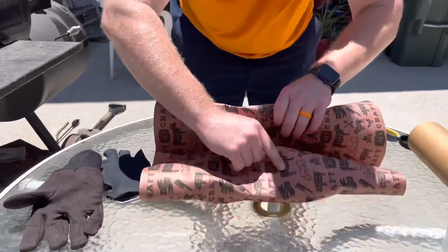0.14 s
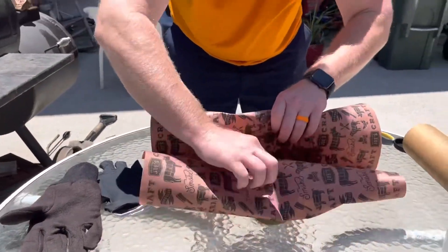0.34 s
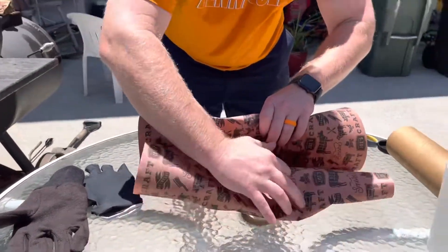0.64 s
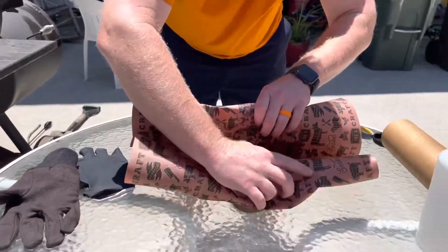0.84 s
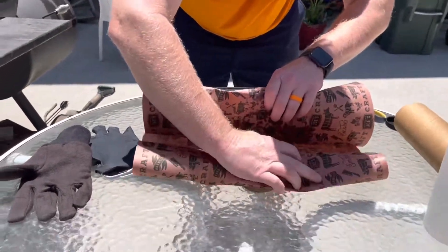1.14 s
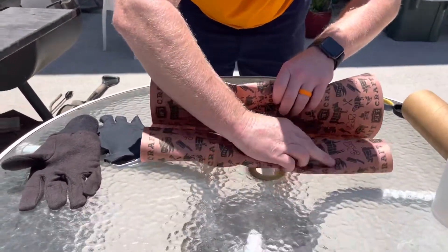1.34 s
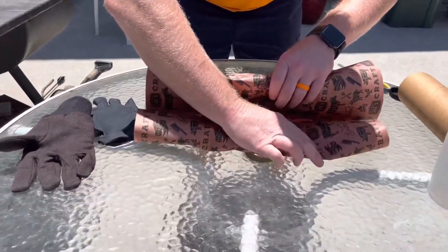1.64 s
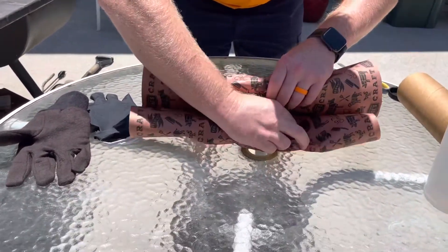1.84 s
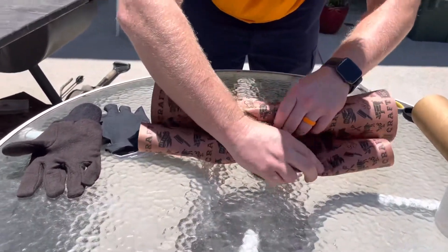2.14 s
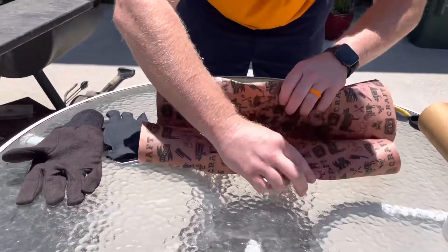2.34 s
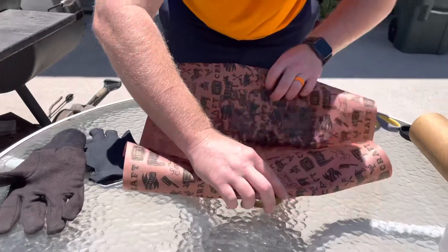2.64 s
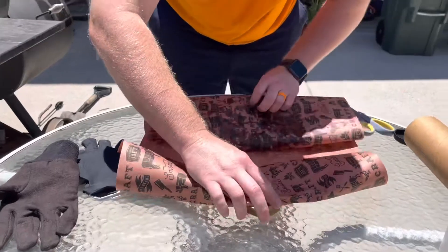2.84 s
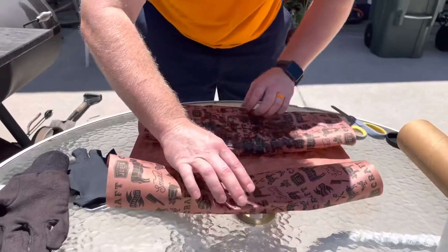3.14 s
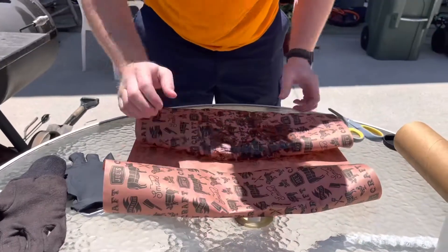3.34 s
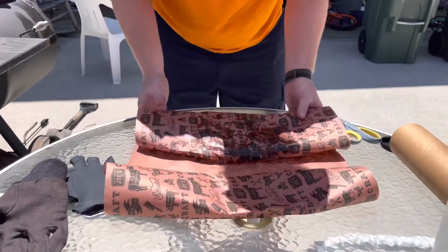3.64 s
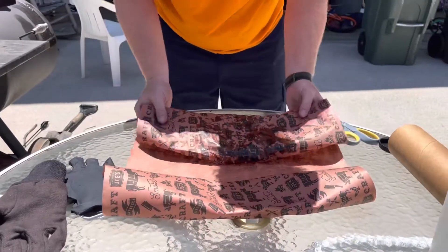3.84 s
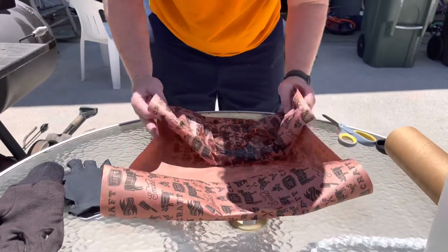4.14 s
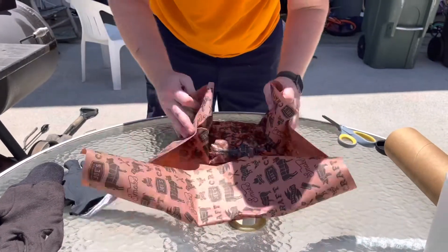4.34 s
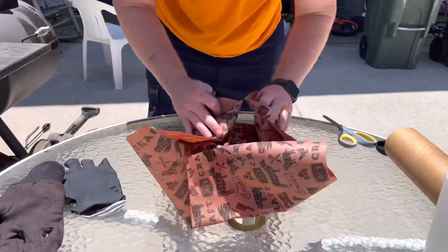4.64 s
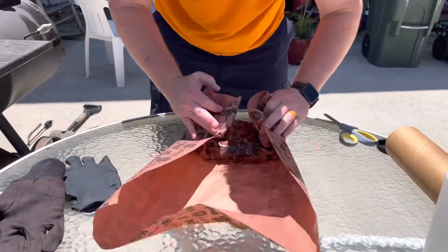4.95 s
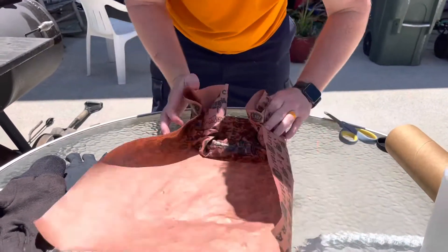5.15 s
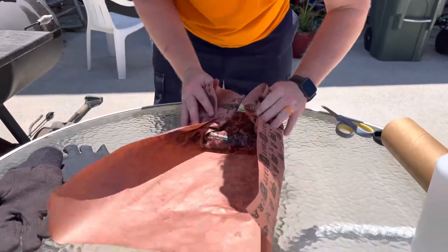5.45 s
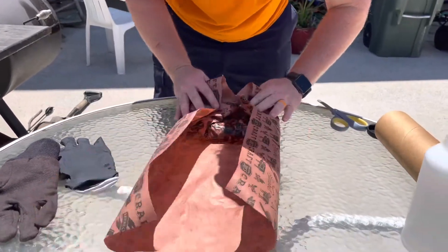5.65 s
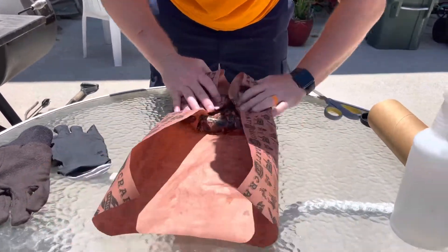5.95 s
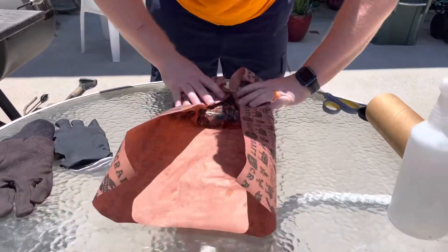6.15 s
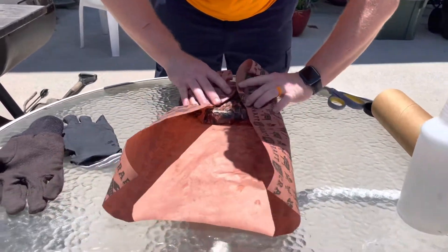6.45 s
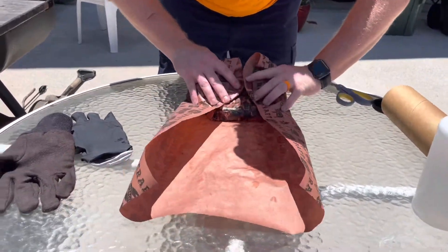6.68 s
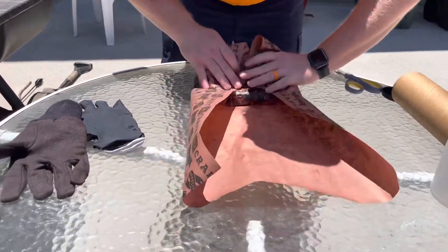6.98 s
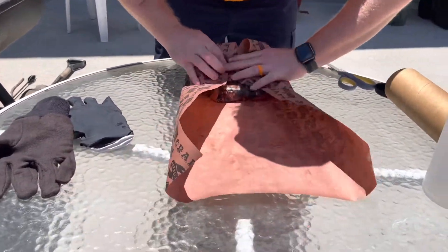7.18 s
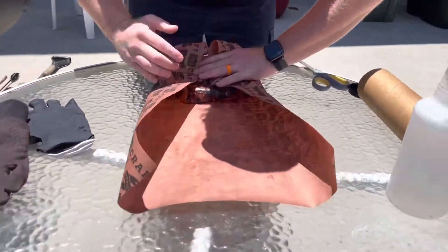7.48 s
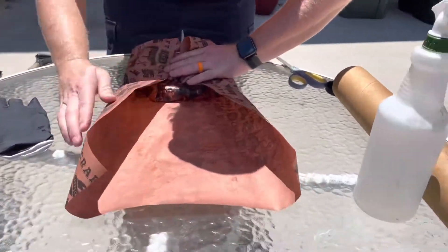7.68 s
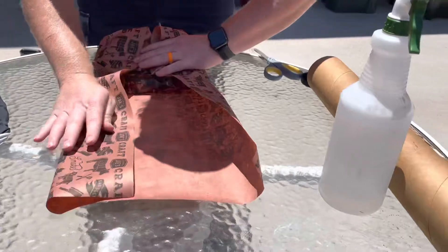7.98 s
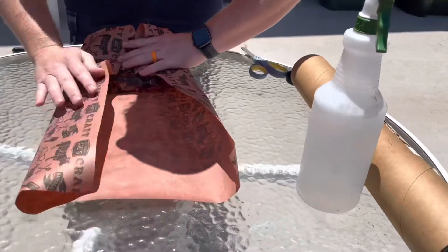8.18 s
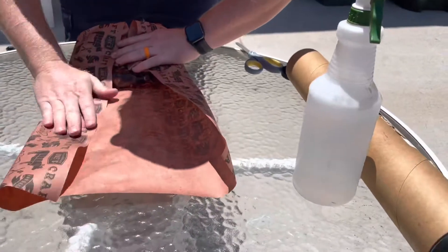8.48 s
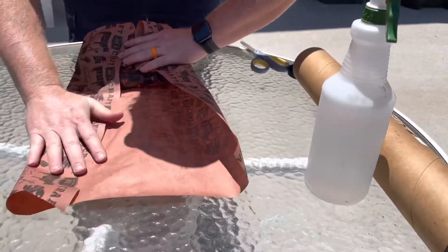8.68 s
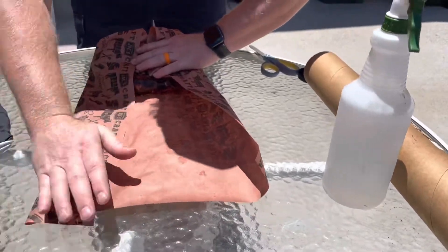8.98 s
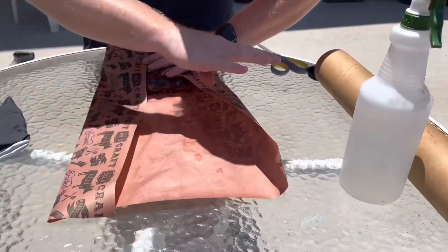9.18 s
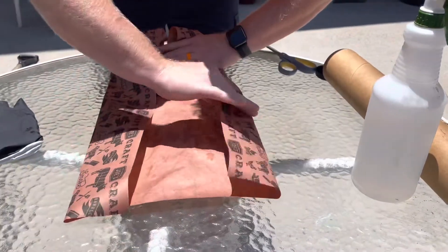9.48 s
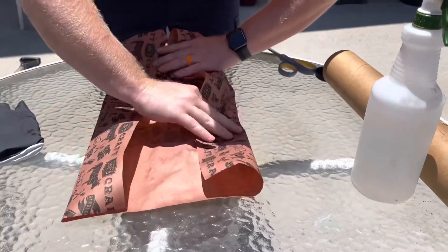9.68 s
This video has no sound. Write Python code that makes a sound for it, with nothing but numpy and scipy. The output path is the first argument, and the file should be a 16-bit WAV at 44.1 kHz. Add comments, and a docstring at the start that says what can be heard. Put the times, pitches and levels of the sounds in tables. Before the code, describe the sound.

Thick paper crinkles, rustles and pops under busy hands on a patio table. Early handling is soft and hollow, dropping almost to nothing after about three seconds. Then it grows crisp and loud, with hard cracks and smooth sliding strokes, a short calm near nine seconds, and a final burst of folding. Dry open-air close stereo pickup with light low wind buffeting.

```python
"""Stiff wrapping paper is folded, creased and smoothed by hand on a garden table, close to a phone.
Creases snap as noise bursts with two panel modes and a brief spit from the edge.
Beneath them the sheet rustles: clumped noise grains, ringing facets, booms and the hiss of sliding palms.
A breeze buffets and flutters at the two microphone ports, as low noise swelling in gusts."""
import sys
import numpy as np
from scipy import signal
from scipy.fft import rfft, irfft, next_fast_len
from scipy.io import wavfile
from scipy.ndimage import uniform_filter1d, map_coordinates

SR = 44100
rng = np.random.default_rng(int(sys.argv[2]) if len(sys.argv) > 2 else 0)


def bounce(signal):
    """Save signal as a 16-bit WAV file at the path given by the first command-line argument."""
    frames = np.transpose(np.atleast_2d(signal))
    limited = np.clip(frames, -1, 1)
    pcm = np.round(limited * 32767).astype(np.int16)
    wavfile.write(sys.argv[1], SR, pcm)


N = 433062  # length [samples]
TOP_HZ = 16900  # band limit


def amp(db):
    """Decibels to gain."""
    return 10 ** (np.asarray(db) / 20)


def unit(x):
    """Scaled to rms 1."""
    return x / np.sqrt(np.mean(x ** 2) + 1e-20)


def along(points, hz):
    """Value at hz of a (frequency, value) curve, read on a log frequency axis."""
    f, v = np.transpose(points)
    return np.interp(np.log(hz + 1), np.log(f + 1), v)


def curves(rows):
    """One value per sample for each column after the time."""
    seconds, *columns = np.transpose(rows)
    return [np.interp(np.arange(N) / SR, seconds, column) for column in columns]


def wobble(rate):
    """A smooth random curve, rate knots a second."""
    knots = rng.standard_normal(int(N * rate / SR) + 4)
    return map_coordinates(knots, [np.arange(N) * rate / SR])


def filtered(x, response):
    """x times a complex response of frequency."""
    m = next_fast_len(N + 8192)
    return irfft(rfft(x, m) * response(np.fft.rfftfreq(m, 1 / SR)), m)[..., :N]


def coloured(x, spectrum):
    """x shaped by a (frequency, gain) spectrum, at rms 1."""
    return unit(filtered(x, lambda hz: amp(along(spectrum, hz))))


def swell(start, length, db, rise_db_per_s, fall_db_per_s):
    """Power of a sound that rises up to its start, holds for its length and dies away."""
    t = np.arange(N) / SR
    drop_db = np.maximum(rise_db_per_s * (start - t), fall_db_per_s * (t - start - length))
    return amp(2 * (db - drop_db.clip(0, 120)))


# Gusts: (full strength from [s], held for [s], buffet before trim [dB], flutter re buffet before trims [dB])
GUSTS = [(0.206, 0.013, -38.5, 0), (0.272, 0.013, -43.5, 6), (0.632, 0.015, -40.5, 6.5),
         (0.781, 0.075, -34, -8.5), (1.202, 0.058, -40, -5), (1.452, 0.05, -33.5, 1.5),
         (1.608, 0.17, -40.5, -1.5), (1.914, 0.14, -41, 3.5), (2.139, 0.014, -29.5, -4),
         (2.519, 0.015, -38, 1), (4.103, 0.0073, -31.5, -3), (5.934, 0.025, -35, -5),
         (6.358, 0.079, -33.5, -10.5), (6.886, 0.01, -33.5, -2), (7.292, 0.014, -34, -4),
         (7.442, 0.061, -39.5, 5), (7.522, 0.073, -31.5, -6.5), (8.427, 0.053, -38.5, -3),
         (9.152, 0.15, -34.5, -3.5), (9.455, 0.026, -34, -4.5)]
GUST_RISE_DB_PER_S, GUST_FALL_DB_PER_S = 495, 217
# Light breeze between gusts: (time [s], buffet before trim [dB])
BREEZE_LEVEL = [(0, -41.5), (1.2, -50), (1.8, -41.5), (3.03, -46), (4.2, -43.5), (5.74, -49.5), (9.38, -40),
                (9.65, -55.5), (9.82, -36)]
CALM_FLUTTER_DB = -6  # re buffet, before trims


def wind_strength():
    """Gains of buffet and flutter: gust powers add to a light breeze."""
    calm_db, = curves(BREEZE_LEVEL)
    buffet = amp(2 * calm_db)
    flutter = amp(2 * (calm_db + CALM_FLUTTER_DB))
    for start, length, db, flutter_db in GUSTS:
        power = swell(start, length, db, GUST_RISE_DB_PER_S, GUST_FALL_DB_PER_S)
        buffet = buffet + power
        flutter = flutter + power * amp(2 * flutter_db)
    return np.sqrt(buffet), np.sqrt(flutter)


# Colour of the slow wind pressure: (frequency [Hz], relative gain [dB])
BUFFET = [(20, -38), (45, -2.5), (70, 3), (130, -2), (250, -21), (600, -97)]
# Colour of the faster eddies: (frequency [Hz], relative gain [dB])
FLUTTER = [(80, -15.5), (170, 0), (300, -5.5), (550, -16.5), (1000, -40), (2000, -80)]


def breeze():
    """Eddies push both ports nearly alike, in lumps; the faster ones flutter."""
    buffet, flutter = wind_strength()
    lumps_db = 7.6 * wobble(22)
    slow = coloured(amp(lumps_db) * rng.standard_normal((2, N)), BUFFET)
    fast = coloured(amp(lumps_db + 4.97 * wobble(35)) * rng.standard_normal((2, N)), FLUTTER)

    def even(x):
        # gusts come from the table, lumps from chance
        return x / np.sqrt(np.abs(uniform_filter1d(x[0] ** 2, SR // 16)) + 0.044)

    mid, side = amp(2.08) * buffet * even(slow) + amp(3.5) * flutter * even(fast)
    return np.array([mid + amp(-7.5) * side, mid - amp(-14.5) * side])


# How hard the paper is worked: (time [s], crackle before rustle trim [dB])
HANDLING = [(0, -42), (.18, -55.5), (.86, -56.5), (.93, -41), (1.62, -47.5), (3.11, -52), (3.15, -67.5),
            (3.425, -72), (3.45, -59), (3.575, -54), (3.6, -44), (4.57, -48.5), (4.72, -45), (5.39, -39),
            (6.55, -45.5), (6.63, -55), (6.78, -41.5), (7.38, -45.5), (7.44, -57.5), (7.683, -72.5),
            (7.69, -46.5), (8.02, -51.5), (8.2, -38.5), (8.75, -46.5), (8.95, -57.5), (9.19, -57),
            (9.322, -73.5), (9.33, -40), (9.74, -51.5), (9.82, -38.5)]
# Single grips and pushes: (full strength from [s], held for [s], crackle before rustle trim [dB])
SCRUNCHES = [(0.73, 0.052, -50), (1.656, 0.095, -41), (2.62, 0.073, -42), (2.797, 0.056, -38),
             (3.777, 0.18, -40.5), (4.119, 0.37, -40), (7.746, 0.11, -41.5), (8.642, 0.032, -39.5),
             (9.494, 0.15, -37.5)]
SCRUNCH_RISE_DB_PER_S, SCRUNCH_FALL_DB_PER_S = 516, 250


def effort():
    """Crackle level in dB: the power of steady handling with single grips on top."""
    power = amp(2 * curves(HANDLING)[0])
    for row in SCRUNCHES:
        power = power + swell(*row, SCRUNCH_RISE_DB_PER_S, SCRUNCH_FALL_DB_PER_S)
    return 10 * np.log10(power)


def grains(count, spread_db, t60, bed_db):
    """Two noises under one envelope of small clumped bucklings on a smooth bed; colour shifts all the time."""
    draw = rng.random((count, 2))
    clumps = np.cumsum(amp(4.0 * wobble(15)))
    at = np.searchsorted(clumps, draw[:, 0] * clumps[-1]).clip(0, N - 1)
    size_db = abs(spread_db) * np.minimum(-np.log(1 - draw[:, 1]), 3.3)
    ticks = np.bincount(at, amp(2 * size_db), N)
    pole = amp(-120 / (t60 * SR))
    power = signal.lfilter([1], [1, -2 * pole, pole ** 2], ticks)  # each swells, then dies
    # level out the slow drift, before and after laying in the bed
    power = power / (uniform_filter1d(power, SR // 5) + 1e-9) + amp(2 * bed_db)
    power = power / uniform_filter1d(power, SR // 5)
    noise = signal.stft(rng.standard_normal((2, N)), nperseg=256)[2]
    field = uniform_filter1d(rng.standard_normal(noise.shape[1:]), size=5, axis=0)  # across frequency
    field = uniform_filter1d(field, size=4, axis=1)  # across time
    mottled = signal.istft(noise * amp(2.83 * unit(field)), nperseg=256)[1][:, :N]
    return np.sqrt(np.abs(power)) * mottled


CRINKLE_HZ, CRINKLE_OCTAVES = 2560, 0.81  # middle pitch and its spread
CRINKLE_CYCLES = 27  # sets the decay: 30 dB in this many cycles


def crinkles(count):
    """Tiny facets flip in clumps; each rings for about 6 ms at most, at its own pitch, strength and place."""
    when, size, side = rng.random((count, 3)).T
    hz = (CRINKLE_HZ * 2 ** (CRINKLE_OCTAVES * rng.standard_normal(count))).clip(700, 7000)
    clumps = np.cumsum(amp(6 * wobble(30)))
    ticks = np.arange(SR // 160)  # each ring is cut after about 6 ms
    at = np.searchsorted(clumps, when * clumps[-1])[:, None] + ticks
    cycles = hz[:, None] * ticks / SR
    strength_db = -4.5 * np.log(1 - .97 * size)[:, None]
    ring = amp(strength_db - 60 * cycles / (2 * CRINKLE_CYCLES)) * np.sin(2 * np.pi * cycles)
    gains = (1, 2 * side[:, None] - 1)
    return unit(np.array([np.bincount(at.ravel(), (ring * g).ravel(), N + SR)[:N] for g in gains]))


# Colours of the small bucklings, the shaking sheet and the hiss: (frequency [Hz], relative gain [dB])
CRACKLE = [(500, -29), (1100, 1.5), (2500, 2.5), (5000, -0.5), (6500, -15), (12000, -22), (16000, -40)]  # also used for the cracks of the snaps
BOOM = [(200, -14.5), (330, -3.5), (560, -1), (800, -8.5), (1200, -8.5), (1800, -20), (3000, -61)]
HISS = [(6000, -3), (9000, -3.5), (13000, -0.5), (15600, -5.5), (16000, -56)]  # closed by 16 kHz; also used for the edge spits
# A free sheet booms, a sheet held flat does not: (time [s], offset added to the boom level [dB])
LOOSE = [(0, 11.5), (.65, 2), (1, 2.5), (2.3, 8), (3, 8.5), (3.8, 4.5), (5.4, 4), (6.6, 0), (7.8, -0.5),
         (8.6, -26), (9.82, -4.5)]
# Palm on the sheet: (time [s], offset added to the hiss level [dB])
SLIDING = [(0, -8.5), (.4, 9.5), (1.1, -4.5), (2.3, -2.5), (2.9, -7.5), (3.7, 3), (4.3, -1), (4.8, -5),
           (6.5, -5.5), (6.85, 3), (7.3, -4.5), (8.3, 1.5), (8.65, 9.5), (8.86, 9.5), (9.0, -5),
           (9.6, -11.5)]
# Air in the folded-up sheet rings: (time [s], level re crackle [dB])
TROUGH = [(3.6, -36), (4.2, -8.5), (6.2, -1.5), (7.0, 1), (7.4, 4), (7.8, -30)]
TROUGH_HZ, TROUGH_SHARPNESS = 1193, 3.8  # sharpness is the Q
BOOM_GROWS, HISS_GROWS = 0.73, 1.1  # dB for each dB of crackle
CRINKLE_DB = -8.5  # re crackle


def rustle():
    """Countless small bucklings crackle and shake the sheet; palms slide with a smoother hiss."""
    crackle_db = effort()
    (loose_db,), (sliding_db,), (trough_db,) = curves(LOOSE), curves(SLIDING), curves(TROUGH)
    mean_db = crackle_db.mean()
    swing_db = crackle_db - mean_db
    boom_db = mean_db + BOOM_GROWS * swing_db + loose_db
    hiss_db = mean_db + HISS_GROWS * swing_db + sliding_db
    # a sliding palm fills the gaps between ticks, a resting one leaves them bare
    rubbing_db = 0.35 * (hiss_db + 32.0)
    fine = grains(count=2400, spread_db=4.0, t60=0.017, bed_db=rubbing_db - 4.0)
    coarse = grains(count=500, spread_db=4.0, t60=0.03, bed_db=rubbing_db)
    slide = grains(count=1200, spread_db=0.0, t60=0.024, bed_db=rubbing_db + 12.0)

    crackle = amp(crackle_db) * coloured(fine, CRACKLE)
    hollow = unit(signal.lfilter(*signal.iirpeak(TROUGH_HZ, TROUGH_SHARPNESS, SR), fine))
    trough = amp(crackle_db + trough_db) * hollow
    boom = amp(boom_db) * coloured(coarse + 0.65 * fine, BOOM)
    hiss = amp(hiss_db) * coloured(slide + 1.56 * fine, HISS)
    facets = amp(crackle_db + CRINKLE_DB) * crinkles(count=4500)
    return amp(-4.0) * (crackle + facets + trough + boom + hiss)  # rustle trim


# Buckling creases, before the layer trims and length offsets:
# (time [s], level [dB], panel pitch [Hz], edge re level [dB], length [ms])
SNAPS = [(0.016, -25.5, 3500, -31, 3.3), (0.054, -31.5, 1540, -35, 5.5), (0.125, -18, 656, -46, 4.5),
         (0.148, -23.5, 554, -13, 4.9), (0.472, -31, 1700, -12, 3.8), (0.585, -18, 637, -19, 22),
         (0.629, -26.5, 1350, -17, 16.5), (0.909, -27, 680, -25, 3.4), (0.922, -23.5, 1240, -3, 2.8),
         (0.933, -17, 2710, -6, 3.7), (0.949, -23, 670, -39, 5.5), (0.98, -40.5, 1340, -26, 4.4),
         (1.061, -22.5, 2410, -5.5, 3.3), (1.329, -23, 4950, -12, 3.6), (1.706, -28.5, 4800, -9, 2.4),
         (1.89, -24.5, 950, -11.5, 9.1), (2.194, -26.5, 745, -9.5, 10.6), (2.46, -25, 3760, -12, 3.3),
         (2.633, -22.5, 1070, -29, 3.7), (2.659, -15.5, 960, -19, 9.5), (2.833, -27.5, 1040, -14, 12),
         (2.857, -22, 560, -28, 5), (2.947, -30, 3170, -13, 2.8), (3.026, -24, 1080, -11, 2.8),
         (3.101, -28, 1710, -14.5, 6), (3.145, -44.5, 3830, -25, 4.1), (3.265, -45.5, 1500, -36, 3.4),
         (3.323, -56, 3900, -27, 4), (3.39, -48, 1440, -20, 6.8), (3.444, -32, 3770, -37, 3.5),
         (3.62, -18, 780, -30, 1.9), (3.856, -22, 1390, -5, 6.4), (4.082, -28, 2840, -6, 14),
         (4.179, -25.5, 1060, -10, 7.7), (4.196, -25.5, 1300, -5, 3), (4.23, -17.5, 1260, -11, 3.4),
         (4.248, -17.5, 1440, -11, 4.8), (4.271, -22.5, 1510, -7, 7.6), (4.329, -16, 456, -30, 5.6),
         (4.714, -17.5, 1880, -8, 3.5), (4.768, -27.5, 1520, -15, 18), (4.775, -24.5, 3770, -8, 2.6),
         (4.799, -18.5, 540, -28, 4), (4.912, -22.5, 3760, -9, 3.1), (5.15, -24, 3700, 0, 4.7),
         (5.227, -33, 1610, 2.5, 3.2), (5.277, -22, 3980, -7, 5.3), (5.295, -21, 560, -3.5, 8.4),
         (5.358, -26, 1090, -2.5, 6.9), (5.378, -20, 1700, -5.5, 7.9), (5.405, -17.5, 1060, -10.5, 6.6),
         (5.439, -12.5, 1170, -2.5, 2.6), (5.498, -28.5, 2150, 14.5, 1.2), (5.514, -20.5, 2040, 1.5, 3.2),
         (5.559, -10.5, 4650, -4, 2.03), (5.825, -21.5, 4940, 6.5, 3.4), (5.853, -28.5, 3800, 1, 10),
         (5.881, -15, 1240, -9, 2.5), (5.919, -26, 1200, 3.5, 4.2), (5.936, -31.5, 4300, 4, 8.7),
         (6.068, -15, 1770, -5, 1.86), (6.147, -20.5, 6340, -7.5, 3.8), (6.186, -20, 1100, -40, 2.2),
         (6.265, -26, 2780, -7, 5.5), (6.401, -11.5, 4430, -16, 1.34), (6.482, -19.5, 496, -41, 3.8),
         (6.565, -8, 2360, -1, 1.93), (6.656, -21.5, 5000, -4, 2.8), (6.718, -25, 6500, 4.5, 2.05),
         (6.863, -36, 1220, 10, 3.7), (6.957, -17, 5000, 3.5, 2), (6.988, -17, 6350, -7, 2),
         (7.055, -24, 4290, -3, 3), (7.176, -23, 4500, -25, 2.1), (7.539, -30, 2820, -20, 2.6),
         (7.761, -22, 3700, -13, 6.2), (7.779, -9.5, 3730, -2.5, 1.35), (7.803, -15.5, 4050, -12, 4.2),
         (7.857, -23, 6100, 3, 3.5), (7.941, -15.5, 4370, -6.5, 2.54), (8.063, -33.5, 1410, -8, 7.3),
         (8.196, -22.5, 415, -16, 12), (8.283, -13.5, 2770, -9, 8.3), (8.298, -21, 6450, 0, 3.3),
         (8.385, -10, 3400, -11, 1.9), (8.399, -16, 3580, -0.5, 1.9), (8.433, -20, 4960, -4, 4),
         (8.47, -10.5, 3640, -19, 3), (8.538, -14.5, 2080, -14, 2.2), (8.625, -22, 3830, -29, 3.7),
         (8.911, -27.5, 4400, -23, 2.9), (8.929, -34, 4500, -5, 6.9), (8.988, -41.5, 2630, -24, 5.1),
         (9.024, -33.5, 2700, -10, 1.9), (9.043, -35.5, 3080, -17, 11), (9.087, -42, 2000, -22, 3.8),
         (9.18, -42, 2970, -23, 4), (9.301, -46.5, 1820, -22, 4.4), (9.333, -31.5, 3640, -15, 3.3),
         (9.355, -28.5, 2500, -24, 7.3), (9.379, -23.5, 1340, 0, 5.5), (9.425, -18.5, 2550, -5, 4.5),
         (9.468, -22, 3930, -20, 2.7), (9.487, -15.5, 1300, -7, 3.4), (9.508, -13.5, 2900, -12.5, 8.6),
         (9.572, -28.5, 2620, -19, 2.6), (9.764, -20.5, 2570, -19, 2.8), (9.787, -15.5, 4060, -6, 2.2)]


def snaps():
    """Each crease gives way, cracks, rings two modes of its small panel and spits, more briefly, from the edge."""
    crack, edge, panel = np.zeros((3, 2, N + SR))
    lead = SR // 100  # room for the onset before each snap
    ms = 1000 * np.arange(-lead, SR // 10) / SR

    def noise():
        return rng.standard_normal((2, len(ms)))

    def mode(hz):
        return unit(signal.lfilter(*signal.iirpeak(hz, 7.0, SR), noise()))

    def shape(db, life):
        """A steep rise and stretched decay, over a faint longer tail."""
        main = amp(db - 14.46 * np.maximum(ms / life, -2.5 * ms / life) ** 0.55)
        tail = amp(db - 30.0 - 0.85 * np.maximum(ms, -3.5 * ms))
        return main + tail

    def burst(envelope, x):
        """x under the envelope, which sets the energy."""
        return envelope * x * np.linalg.norm(envelope) / np.linalg.norm(envelope * x[0])

    for s, db, hz, edge_db, length in SNAPS:
        first = round(s * SR) - lead
        at = slice(first, first + len(ms))
        body_shape = shape(db, length - 1.1)
        edge_shape = shape(db, 0.69 * length - .9)
        lowpass = signal.butter(2, min(1.83 * hz, TOP_HZ), fs=SR)  # big panels crack duller
        crack[:, at] += burst(body_shape, signal.lfilter(*lowpass, noise()))
        edge[:, at] += amp(edge_db) * burst(edge_shape, noise())
        panel[:, at] += burst(body_shape, mode(hz) + amp(-9.5) * mode(2.51 * hz))

    cracks = filtered(crack[:, :N], lambda hz: amp(along(CRACKLE, hz)))
    spits = filtered(edge[:, :N], lambda hz: amp(along(HISS, hz)))
    return amp(-4.0) * cracks + amp(-2.0) * panel[:, :N] + amp(9.5) * spits


# Lag between the two ports: (frequency [Hz], phase by which left leads [rad])
LEAD = [(300, 0), (3100, .9), (5300, .5), (6500, -.8), (8600, -3.1), (13500, -6.3), (17000, -6.6)]
# Shadow between the two ports: (frequency [Hz], left minus right [dB])
TILT = [(180, -1.5), (550, 3.5), (1650, 3.5), (4970, 6), (8500, -0.5), (15000, 0.5)]
# Paper sound shared by the ports: (frequency [Hz], likeness [0 to 1])
ALIKE = [(300, 0.97), (1000, 0.76), (4000, 0.67), (9000, 0.95), (14000, 1)]


def ports(pair):
    """A shared and an unshared part reach the two ports, each port with its own lag and shadow."""
    def share(hz):
        turn = np.arccos(np.clip(along(ALIKE, hz), 0, 1)) / 2
        return np.array([np.cos(turn), np.sin(turn)])

    def left_right(hz):
        half = amp(along(TILT, hz) / 2) * np.exp(.5j * along(LEAD, hz))
        return np.array([half, 1 / half])

    mid, side = filtered(pair, share)
    return filtered(np.array([mid + side, mid - side]), left_right)


def scene():
    """Paper through the ports, wind on them."""
    return ports(rustle() + snaps()) + breeze()


def record(dry):
    """The loudest cracks are rounded off, and nothing is kept above the band limit."""
    top = .76  # ceiling of the rounding
    rounded = dry / (1 + np.abs(dry / top) ** 4) ** (1 / 4)
    return filtered(rounded, lambda hz: hz < TOP_HZ)


dry = scene()
out = record(dry)
bounce(out)
```